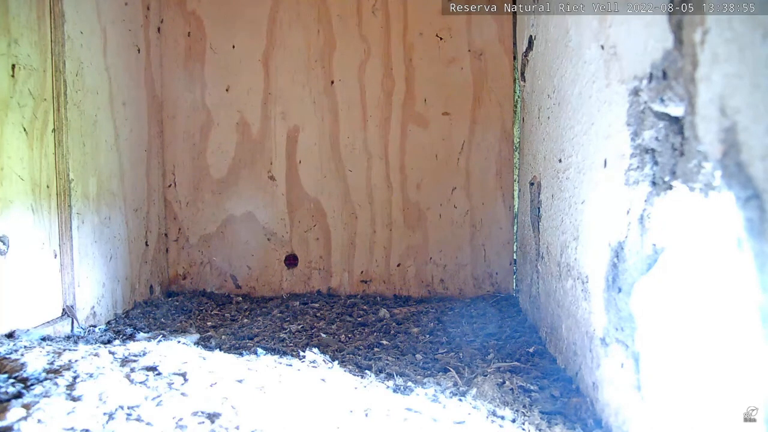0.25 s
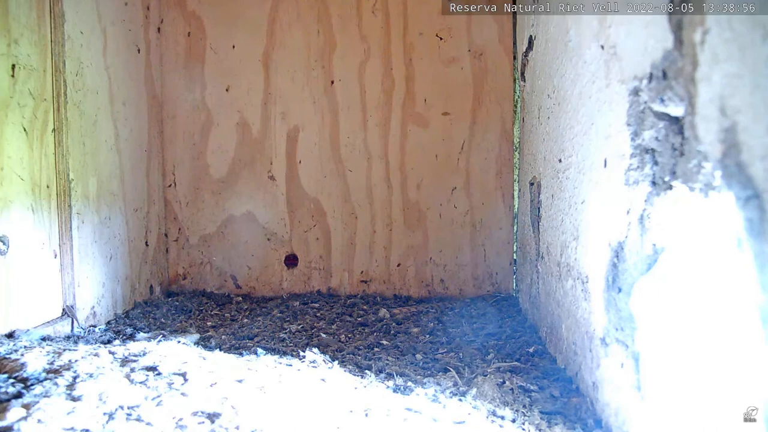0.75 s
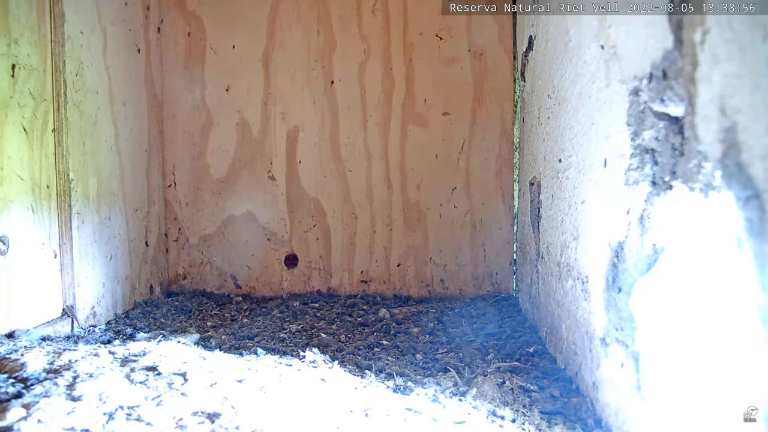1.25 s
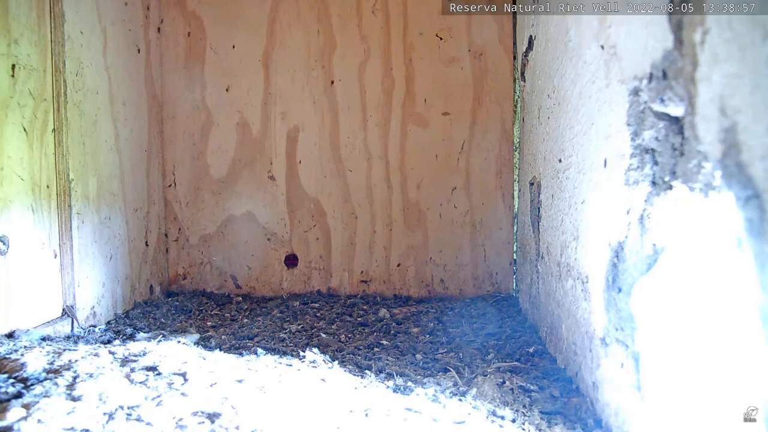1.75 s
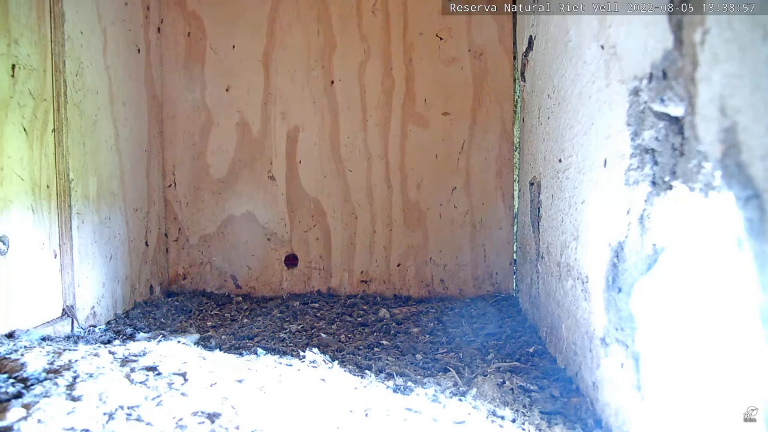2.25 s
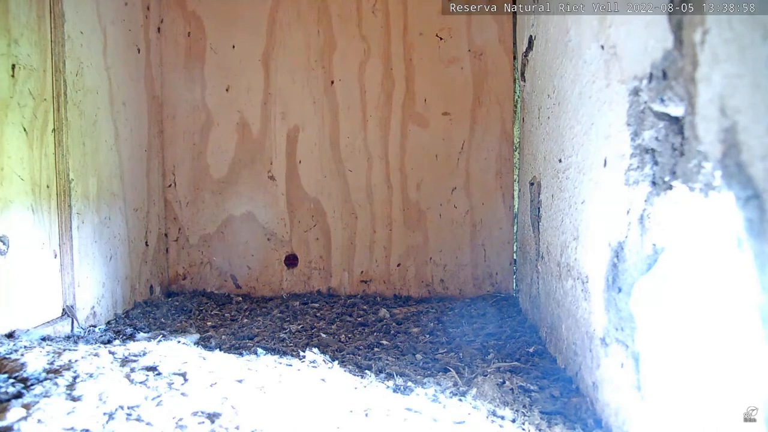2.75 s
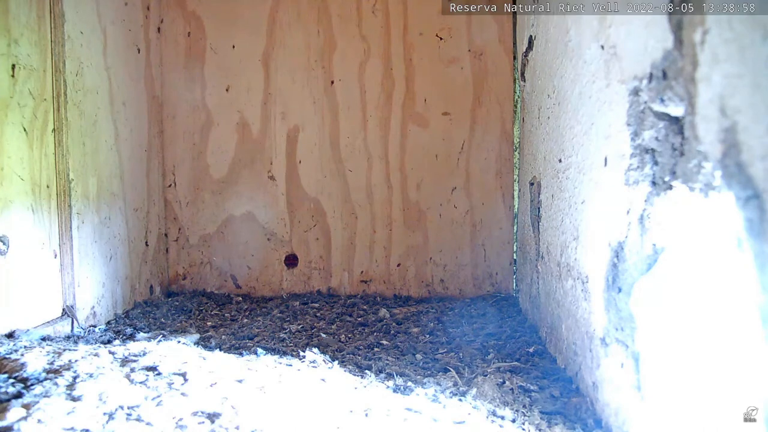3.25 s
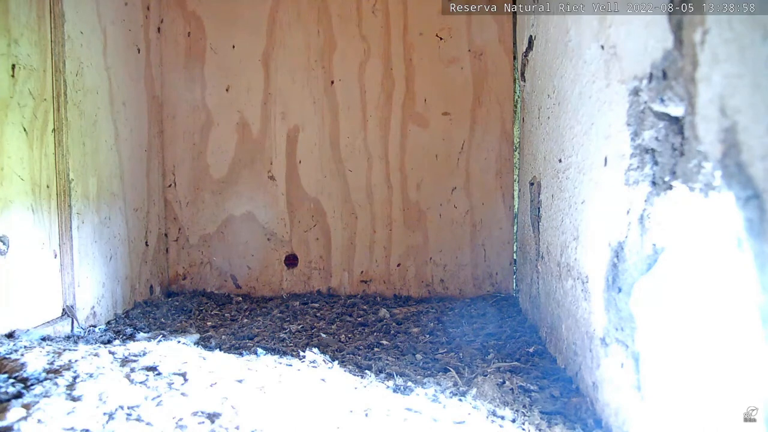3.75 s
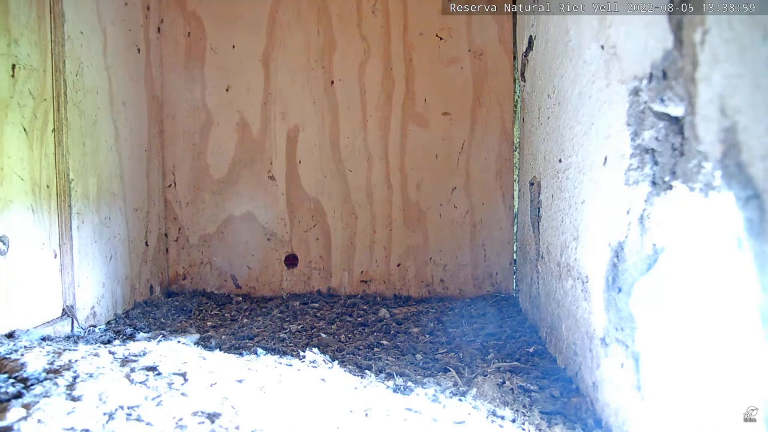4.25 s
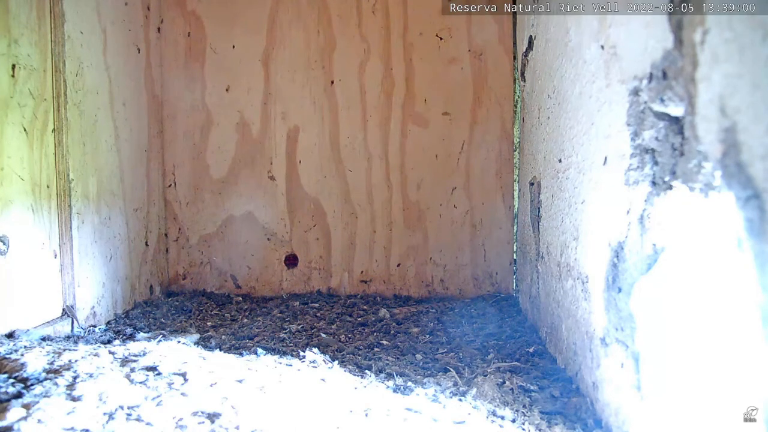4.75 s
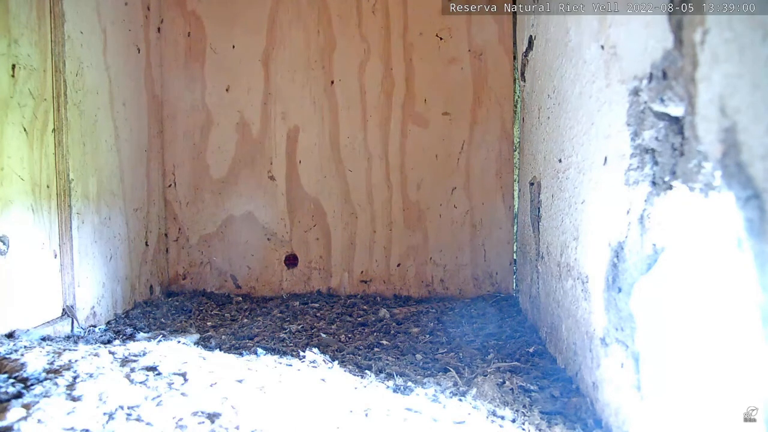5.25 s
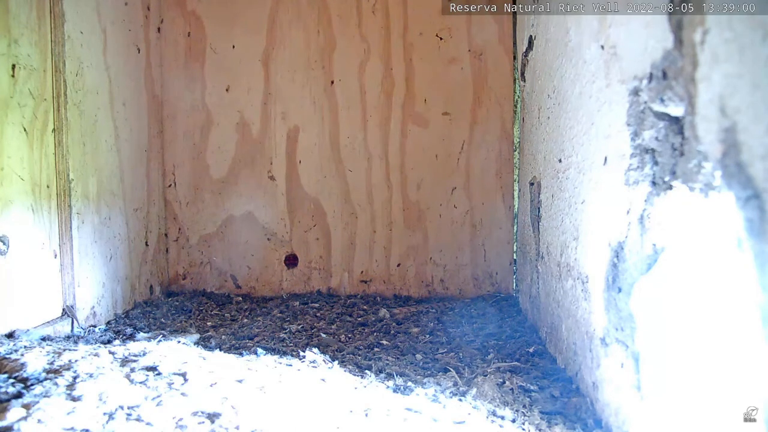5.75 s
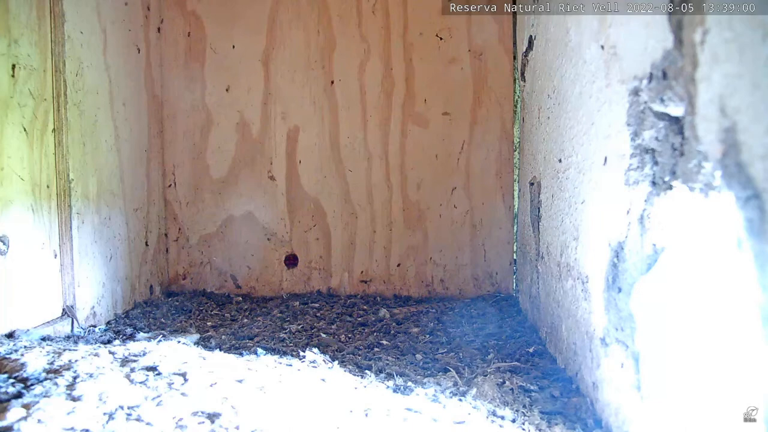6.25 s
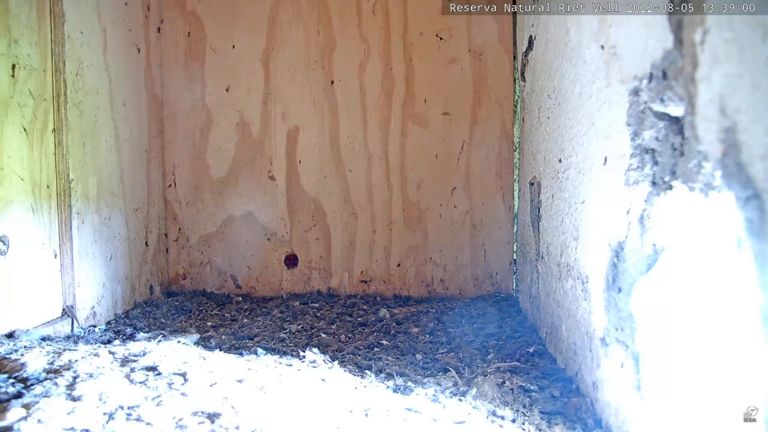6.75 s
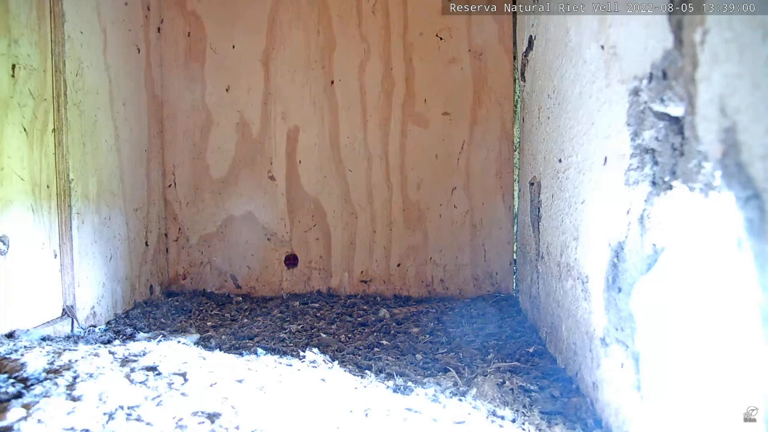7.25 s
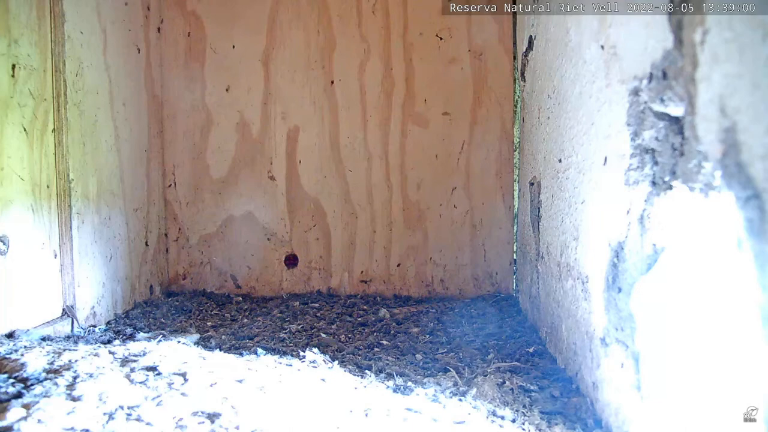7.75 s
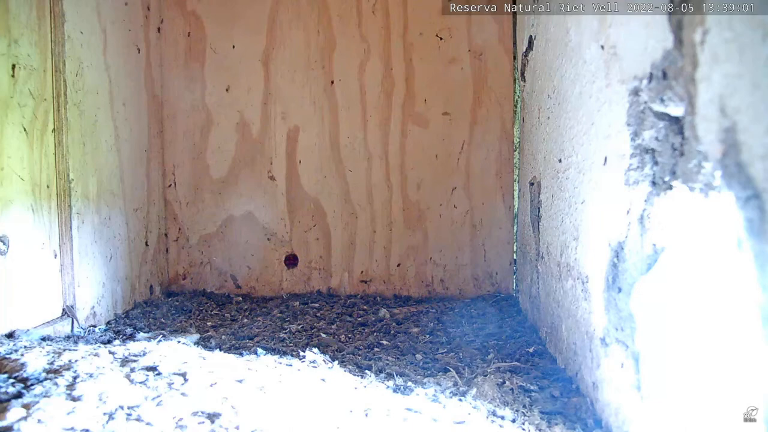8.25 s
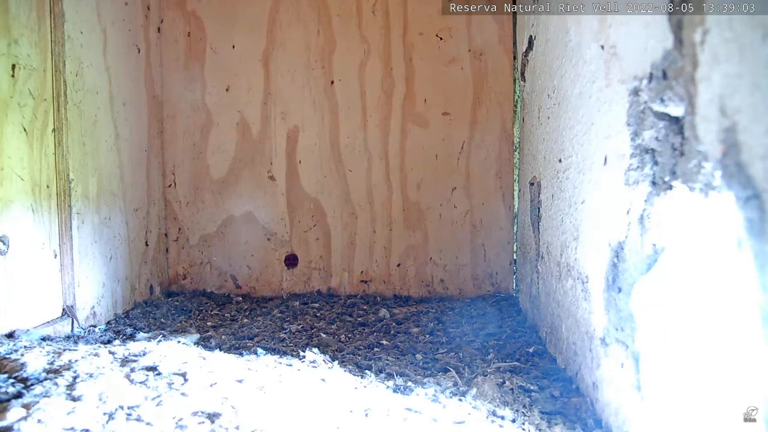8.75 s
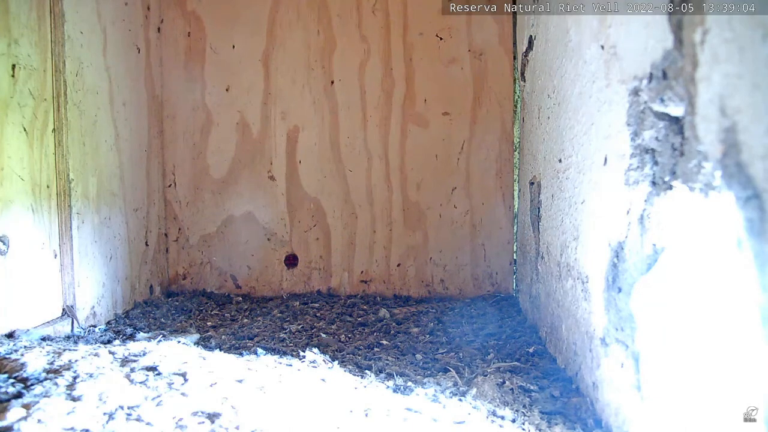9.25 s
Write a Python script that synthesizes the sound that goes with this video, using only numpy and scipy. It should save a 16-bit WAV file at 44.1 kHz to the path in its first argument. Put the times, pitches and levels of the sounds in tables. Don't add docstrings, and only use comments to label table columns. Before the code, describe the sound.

A constant fifty-hertz mains buzz with odd overtones sits under wide, steady microphone hiss, close and electrical, with no room echo. The treble flickers slightly between centre and sides, like a poor digital link. A faint brief high swell and a longer lower one pass early, almost buried. Late on, a low thump drops the signal into complete silence, and a weaker bump restores it, fading up to the end.

```python
import sys
import numpy as np
from scipy import signal
from scipy.fft import rfft, irfft, next_fast_len
from scipy.io import wavfile
from scipy.ndimage import map_coordinates

SR = 44100
rng = np.random.default_rng(int(sys.argv[2]) if len(sys.argv) > 2 else 0)


def amplitude_ratio(level_db):
    exponent = np.asarray(level_db, float) / 20
    return 10 ** exponent


def dump_mix(stems):
    frames = np.atleast_2d(stems).T
    limited = np.clip(frames, -1, 1)
    pcm = np.round(limited * 32767).astype(np.int16)
    wavfile.write(sys.argv[1], SR, pcm)


N = 418491

MAINS_HZ = 50.0055
CUT_S, BACK_S = 8.11425, 8.47425


def unit(x):
    return x / np.sqrt(np.mean(x ** 2) + 1e-20)


def along(hz, points, values):
    return np.interp(np.log(hz + 1), np.log(np.asarray(points) + 1), values)


def filtered(x, response):
    m = next_fast_len(N + 8192)
    spectrum = rfft(x, m) * response(np.fft.rfftfreq(m, 1 / SR))
    return irfft(spectrum, m)[..., :N]


def noise(spectrum):
    points_hz, level_db = np.transpose(spectrum)
    return unit(filtered(rng.standard_normal(N), lambda hz: amplitude_ratio(along(hz, points_hz, level_db))))


def wobble(rate):
    knots = rng.standard_normal(int(N * rate / SR) + 4)
    return map_coordinates(knots, [np.arange(N) * rate / SR])


def charging_pulse():
    t = np.fft.fftfreq(1000) / MAINS_HZ
    climb = np.sin(np.pi / 2 * np.clip(1 + t / .0036, 0, 1))
    ring = np.exp(-t / .00135) * np.cos(2 * np.pi * 156 * t)
    pulse = np.where(t < 0, climb, ring)
    return pulse - .97 * np.roll(pulse, len(t) // 2)


def hum():
    # multiple, level_db (rms)
    pickup = [(1, -29.5), (2, -63.9), (3, -32.8), (4, -66.6), (5, -44.7), (7, -52.0), (9, -51.4),
              (11, -62.1), (15, -72.9), (17, -75.7), (19, -74.1), (21, -76.0), (23, -71.0), (25, -74.2),
              (27, -84.5), (31, -77.1), (33, -74.4), (37, -77.2), (39, -75.0), (41, -84.0), (43, -81.3),
              (47, -82.6), (10, -72.5), (53, -75.5), (55, -79.5), (57, -80.5), (61, -78.5)]
    first_pulse_s = .00305
    shape = rfft(charging_pulse())
    turns = MAINS_HZ * (np.arange(N) / SR - first_pulse_s) + .0018 * wobble(1.5)
    buzz = 0
    for multiple, level_db in pickup:
        phase = np.angle(shape[int(multiple)])
        buzz = buzz + np.sqrt(2) * amplitude_ratio(level_db) * np.cos(2 * np.pi * multiple * turns + phase)
    return buzz * amplitude_ratio(0.14 * wobble(2.7))


def preamp():
    # pitch_hz, density_db (per Hz)
    rumble_colour = [(15, -15), (35, -1.5), (60, -2), (120, -1), (190, -0.5), (280, -6), (420, -7.5),
                     (540, -12.5), (700, -23.5), (1100, -51.5)]
    # pitch_hz, density_db (per Hz)
    hiss_colour = [(380, -36.5), (650, -8), (891, -7), (1140, -1), (1630, 0.5), (2270, -2.5), (3150, -1),
                   (3840, -4.5), (4930, -5), (5930, -9.5), (8570, -5.5), (12100, -7), (12600, -6.5),
                   (13800, -9), (15100, -23.5)]
    # time_s, rumble_db, hiss_db
    drift = [(0.0, -44.5, -45.5), (9.49, -45, -46)]
    time_s, rumble_db, hiss_db = np.transpose(drift)
    t = np.arange(N) / SR
    rumble_gain = amplitude_ratio(np.interp(t, time_s, rumble_db) + .6 * wobble(6))
    hiss_gain = amplitude_ratio(np.interp(t, time_s, hiss_db) + 0.37 * wobble(9))
    return rumble_gain * noise(rumble_colour), hiss_gain * noise(hiss_colour)


def widened(x):
    # pitch_hz, level_db (left minus right), lead_rad (left leads)
    tilt = [(190, 0, 0), (350, -1.6, -0.32), (450, -3.5, -0.13), (600, -2.0, 0.08), (720, 0, 0),
            (820, 0, -0.04), (1000, -2.2, -0.25), (1250, -4.4, 0.03), (1500, -2.4, 0.34), (1900, 0.3, 0.24),
            (2300, 2.4, 0.04), (4000, 2.8, 0.0), (4400, 2.0, 0), (7000, 0.9, 0)]
    pitch_hz, level_db, lead_rad = np.transpose(tilt)

    def side_response(hz):
        ratio = amplitude_ratio(along(hz, pitch_hz, level_db)) * np.exp(1j * along(hz, pitch_hz, lead_rad))
        return (ratio - 1) / (ratio + 1)

    side = filtered(x, side_response)
    return np.array([x + side, x - side])


def turned(hz, t):
    # middle_s, length_s, then the band numbers
    long_slips = [(.503, .045, 13, 17), (.517, .05, 11), (.839, .054, 18), (1.636, .045, 14, 17),
                  (1.8, .05, 15, 17), (2.009, .065, 18), (2.04, .075, 14, 16), (2.126, .04, 18),
                  (2.603, .058, 12, 17, 19), (3.125, .045, 17), (4.123, .055, 12, 14), (4.486, .06, 15, 17),
                  (4.792, .042, 11, 13, 16), (4.805, .045, 18, 19), (4.888, .058, 16, 18),
                  (5.048, .045, 16, 18), (5.115, .04, 11, 14), (5.39, .045, 12), (5.495, .04, 11, 12, 13),
                  (5.56, .048, 16), (5.912, .07, 16), (5.943, .048, 14), (6.12, .055, 16, 18),
                  (6.254, .062, 17), (6.53, .05, 12, 16, 18), (6.882, .042, 15), (7.022, .06, 17, 18),
                  (7.485, .055, 15, 17, 18), (9.334, .045, 13, 15)]
    # middle_s, band number
    flicks = [(.013, 18), (1.029, 12), (1.154, 16), (1.408, 12), (1.795, 11), (1.93, 14), (1.993, 17),
              (2.299, 12), (2.717, 12), (2.83, 13), (3.104, 18), (3.244, 16), (3.5, 14), (3.715, 11),
              (3.817, 15), (3.904, 17), (4.497, 13), (4.647, 13), (5.442, 15), (5.937, 11), (6.061, 11),
              (6.269, 18), (6.362, 15), (6.402, 13), (6.493, 14), (6.766, 12), (7.81, 16), (8.002, 15),
              (9.11, 16), (9.283, 11)]
    band_hz, spill_hz = 750, 10
    flick_s, turn_s = 0.025, .02
    drag_share, drag_s = .3, .03

    slips = [(s, length, 1, band) for s, length, *bands in long_slips for band in bands]
    slips += [(s, flick_s, 1, band) for s, band in flicks]
    for row in long_slips:
        u, v = rng.random(2)
        slips.append((row[0] + drag_s * (u - .5), flick_s, drag_share, 8 + int(11 * v * v)))

    share = np.zeros((len(hz), len(t)))
    for s, length, part, band in slips:
        inside = abs(hz - (band + .5) * band_hz) < band_hz / 2 + spill_hz
        turn = np.clip((length / 2 - abs(t - s)) / turn_s + .5, 0, 1)
        share[inside] = np.maximum(share[inside], part * np.sin(np.pi / 2 * turn) ** 2)
    return share


def slipping_bands(x):
    frames = dict(fs=SR, nperseg=512, noverlap=384)
    hz, t, (mid, side) = signal.stft([x[0] + x[1], x[0] - x[1]], **frames)
    share = turned(hz, t)
    block = (t * SR / 1024).astype(int)
    blocks = block[-1] + 1
    side_top_hz = 4690 + 520 * rng.binomial(3, .45, size=blocks)[block]
    mid_top_hz = 15190 - 90 * rng.exponential(size=blocks)[block]
    away_from_dropout = abs(t - (CUT_S + BACK_S) / 2) > .2
    stranger = np.roll(mid, 40, axis=1)
    side = side * (hz[:, None] < side_top_hz) + np.sqrt(share) * stranger
    mid = mid * (1 - share) ** 0.61 * ~((hz[:, None] > mid_top_hz) & away_from_dropout)
    mid, side = signal.istft([mid, side], **frames)[1][:, :N] / 2
    return np.array([mid + side, mid - side])


def outdoors():
    # middle_s, length_s, centre_hz, width_hz, level_db
    swells = [
        (2.78, .4, 1450, 600, -54.5),
        (2.53, .12, 2400, 300, -61),
    ]
    t = np.arange(N) / SR
    total = 0
    for s, length, hz, width, level_db in swells:
        band = noise([(hz - width, -60), (hz - width / 2, 0), (hz + width / 2, 0), (hz + width, -60)])
        total = total + amplitude_ratio(level_db - 9.8 * ((t - s) / length * 2) ** 2) * band
    return total


def thump(s, size):
    u = np.maximum(np.arange(N) / SR - s, 0)
    bass = np.exp(-u / .0017) * np.sin(2 * np.pi * 132 * u + .5)
    middle = .47 * np.exp(-u / .0005) * np.sin(2 * np.pi * 620 * u - .1)
    return size * (u > 0) * (bass - middle)


def recovery(deep, slow_s):
    t = np.arange(N) / SR
    since = np.maximum(t - BACK_S, 0)
    creep = 1 - 0.23 * np.exp(-since / 0.01) - deep * np.exp(-since / slow_s)
    return np.where(t < CUT_S, 1, np.where(t < BACK_S, 0, creep))


def scene():
    rumble, hiss = preamp()
    offset = -.0018
    low = (hum() + rumble + offset) * recovery(deep=0.55, slow_s=0.19)
    high = (hiss + outdoors()) * recovery(deep=0.54, slow_s=0.2)
    return widened(low + high + thump(CUT_S, .17) - thump(BACK_S, .042))


def roll_off(x):
    return signal.sosfilt(signal.butter(12, 15450, fs=SR, output="sos"), x)


def record(dry):
    return roll_off(slipping_bands(dry))


dry = scene()
out = record(dry)
dump_mix(out)
```